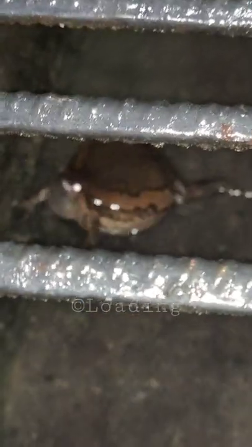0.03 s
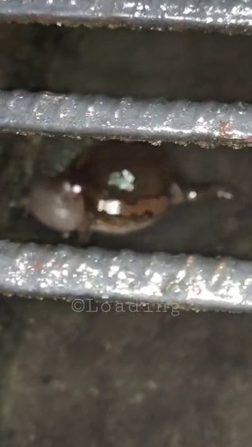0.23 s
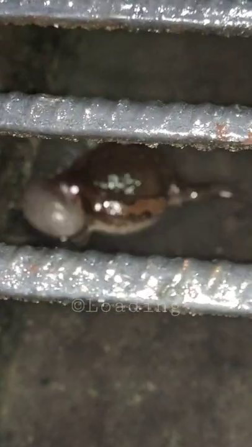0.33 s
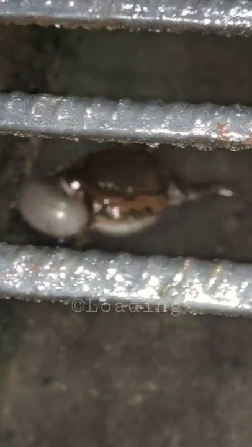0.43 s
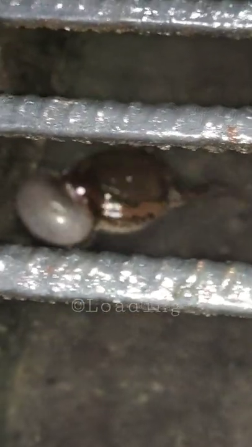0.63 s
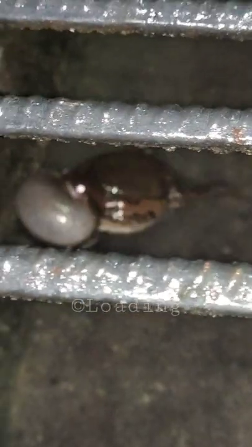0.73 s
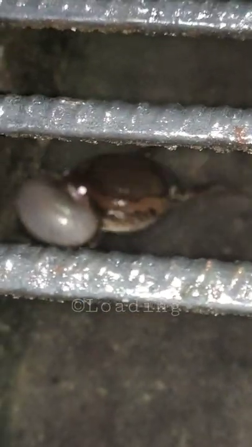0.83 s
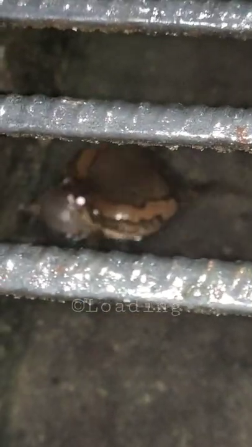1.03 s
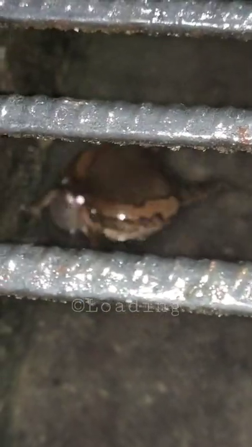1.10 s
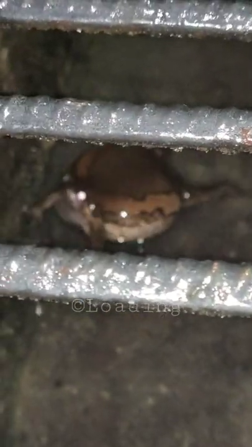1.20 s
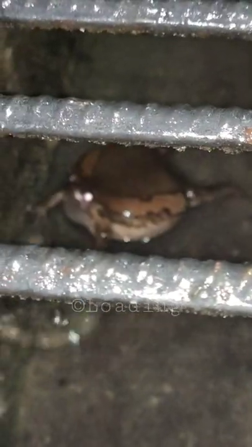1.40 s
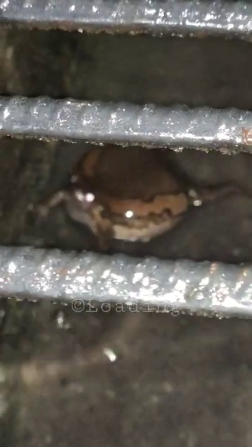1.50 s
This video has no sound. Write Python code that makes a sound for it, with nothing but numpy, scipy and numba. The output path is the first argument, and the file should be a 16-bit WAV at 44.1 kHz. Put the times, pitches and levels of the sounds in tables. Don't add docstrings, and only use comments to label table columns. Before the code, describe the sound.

Loud buzzing frog bellow swells and fades inside a drain, followed by small drips and ticks

```python
import sys
import numpy as np
from scipy import signal
from scipy.fft import rfft, irfft, next_fast_len
from scipy.io import wavfile
from scipy.ndimage import uniform_filter1d
from numba import njit

SR = 44100
rng = np.random.default_rng(int(sys.argv[2]) if len(sys.argv) > 2 else 0)


def undo_db(level):
    steps = np.asarray(level, float) / 20
    return 10 ** steps


def persist_wave(psi):
    counts = np.round(np.clip(psi, -1, 1) * 32767).astype(np.int16)
    wavfile.write(sys.argv[1], SR, np.atleast_2d(counts).T)


N = 68355

# time in seconds, pulse rate in Hz, level in dB,
# brightness as pulse cut-off in Hz, sac resonance in Hz, mouth resonance in Hz.
BELLOW_ROWS = [
    (.128, 95.9, -35.5, 291.5, 337.5, 905),
    (.16, 103.3, -26.5, 350, 344, 892),
    (.235, 111.1, -15, 643, 353.4, 957),
    (.27, 123.3, -12, 852, 297.5, 1017),
    (.35, 126.7, -9, 1353, 296, 1305),
    (.58, 120.8, -9, 1390, 243.5, 1240),
    (.82, 124.4, -12, 1204, 245.6, 1314),
    (.955, 122.1, -18, 825, 261, 1250),
    (1.03, 115.4, -30.5, 360, 248, 1316),
]


def rms_one(x):
    return x / np.sqrt(np.mean(x ** 2) + 1e-20)


def at_hz(points, hz):
    points = np.array(points)
    return np.interp(np.log(hz), np.log(points[:, 0]), points[:, 1])


def slow(x, rate_hz):
    r = np.exp(-2 * np.pi * rate_hz / SR)
    return signal.lfilter([(1 - r) ** 2], [1, -2 * r, r * r], x)


def butter(x, hz, kind, order=2):
    return signal.sosfilt(signal.butter(order, hz, kind, fs=SR, output="sos"), x)


@njit
def moving_peak(x, cos_w, r):
    y = np.zeros(len(x))
    for i in range(2, len(x)):
        drive = (1 - r * r) / 2 * (x[i] - x[i - 2])
        y[i] = drive + 2 * r * cos_w[i] * y[i - 1] - r * r * y[i - 2]
    return y


def peak(x, hz, width_hz):
    cos_w = np.cos(2 * np.pi * hz / SR) + np.zeros(len(x))
    return moving_peak(x, cos_w, np.exp(-np.pi * width_hz / SR))


def double_peak(x, hz, width_hz):
    return peak(peak(x, hz, width_hz), hz, width_hz)


def narrow_hiss(hz, width_hz, db):
    return undo_db(db) * rms_one(double_peak(rng.standard_normal(N), hz, width_hz))


def colour(x, bells):
    for hz, width_hz, db in bells:
        g, a, c = undo_db(db / 2), np.pi * width_hz / SR, -2 * np.cos(2 * np.pi * hz / SR)
        x = signal.lfilter([1 + a * g, c, 1 - a * g], [1 + a / g, c, 1 - a / g], x)
    return x


def later(x, delay_s):
    return np.interp(np.arange(N) - delay_s * SR, np.arange(N), x, left=0)


def night():
    # frequency in Hz, level in dB.
    spectrum = [(40, -25.5), (140, 3), (270, -2), (500, -25), (1200, -19), (2900, -17), (8000, -25),
                (15000, -41.5)]
    # frequency in Hz, correlation 0-1.
    likeness = [(100, 1), (400, 0.62), (1500, 0.47), (5000, 0)]
    night_db, patchy_db, patch_rate_hz = -45.5, 2, 15
    out = 0
    edges_hz = 30 * 2 ** np.arange(0, 9.1, .5)
    white = rng.standard_normal((2, 2, N))
    for k, (low_hz, high_hz) in enumerate(zip(edges_hz, edges_hz[1:])):
        mid, side = butter(white[k % 2], [low_hz, high_hz], "band")
        hz = np.sqrt(low_hz * high_hz)
        alike = np.clip(at_hz(likeness, hz), 0, 1)
        patches = rms_one(slow(rng.standard_normal(N), patch_rate_hz))
        gain = undo_db(at_hz(spectrum, hz) + patchy_db * patches)
        out = out + gain * (np.sqrt(1 + alike) * mid + np.sqrt(1 - alike) * side * [[1], [-1]])
    return undo_db(night_db) * rms_one(out)


def insects():
    # centre in Hz, width in Hz, level in dB.
    bands = [(3040, 300, -62.5)]
    return np.array([sum(narrow_hiss(*row) for row in bands) for _ in range(2)])


def drone():
    return narrow_hiss(147, width_hz=40, db=-55.5)


def drips():
    # start in seconds, peak in dB, pitch in Hz, T60 in seconds.
    bubbles = [
        (.191, -26, 2700, .028),
        (1.065, -33, 4650, .025),
        (1.299, -33, 1600, .045),
        (1.328, -39, 1650, .06),
        (1.408, -46, 3100, .05),
    ]
    rise_s, side_phase = .005, np.array([[-.9], [0]])
    out, t = np.zeros((2, N + SR)), np.arange(SR // 5) / SR
    for start_s, db, hz, t60_s in bubbles:
        bubble = np.sin(2 * np.pi * hz * (t + 0.67 * t * t) + side_phase)
        bubble = bubble * np.minimum(t / rise_s, 1) ** 2
        first = int(start_s * SR)
        out[:, first:first + len(t)] += bubble * undo_db(db - 60 * t / t60_s)
    return out[:, :N]


def ticks():
    # start in seconds, peak in dB, centre in Hz, T60 in seconds.
    hits = [
        (.1176, -39, 4200, .07),
        (1.1468, -34, 3100, .11),
        (1.2381, -29, 2900, .035),
        (1.3922, -40, 5500, .025),
        (1.3925, -34, 1000, .04),
        (1.4496, -46, 3000, .04),
        (1.258, -48, 2800, .15),
        (1.238, -40, 7000, .025),
    ]
    spread, edge_db, rise_s = 1.6, -14, .0005
    out, t = np.zeros((2, N + SR)), np.arange(SR // 5) / SR
    for start_s, db, hz, t60_s in hits:
        spray = rng.standard_normal((2, len(t)))
        spray = spray + spray.mean(0)
        body = rms_one(butter(spray, [hz / spread, hz * spread], "band"))
        burst = body + undo_db(edge_db) * butter(spray, hz, "high")
        first = int(start_s * SR)
        out[:, first:first + len(t)] += burst * undo_db(db - 3 - 60 * t / t60_s) * np.minimum(t / rise_s, 1)
    return out[:, :N]


def level_db(rows):
    release_db_per_s = 300
    table, t = np.array(rows), np.arange(N) / SR
    s, db = table[:, 0], table[:, 2]
    return np.interp(t, s, db, left=-120) - release_db_per_s * np.maximum(t - s[-1], 0)


def larynx(rate_hz, bright_hz):
    # time in seconds, roughness 0-1.
    roughness = [
        (.235, .55),
        (.27, .008),
        (.955, .008),
        (.975, .4),
        (1.06, .3),
        (1.08, .05),
        (1.3, .05),
        (1.38, .6),
        (1.42, .4),
        (1.455, .02),
    ]
    rough = np.interp(np.arange(N) / SR, *np.transpose(roughness))
    turns = np.cumsum(rate_hz) / SR
    chance = rng.standard_normal((2, 400))
    time_wobble, size_wobble = [np.interp(turns + .5, np.arange(400), c) for c in chance]
    phase = 2 * np.pi * (turns + .3 * rough * np.tanh(time_wobble))
    pulses = sum(np.exp(-(k * rate_hz / bright_hz)) * np.cos(k * phase) for k in range(1, 30))
    return -pulses * undo_db(7 * rough * size_wobble), phase


def frog(rows, high_cut_hz):
    sac_width_hz, mouth_width_hz, mouth_db, flat_db, low_cut_hz = 83, 160, 3.5, -18, 220
    first_db, breath_db, breath_hz = -34, -33, 420
    s, *columns = np.transpose(rows)
    rate_hz, _, bright_hz, sac_hz, mouth_hz = [np.interp(np.arange(N) / SR, s, c) for c in columns]
    pulses, phase = larynx(rate_hz, bright_hz)
    sac = peak(pulses, sac_hz, sac_width_hz)
    mouth = undo_db(mouth_db) * peak(pulses, mouth_hz, mouth_width_hz)
    voice = sac - mouth + undo_db(flat_db) * pulses
    voice = butter(butter(voice, low_cut_hz, "high", order=8), high_cut_hz, "low", order=6)
    even = np.sqrt(uniform_filter1d(voice ** 2, size=2600) + 1e-9)
    breath = rms_one(butter(rng.standard_normal(N), [breath_hz / 2, breath_hz * 1.5], "band"))
    voice = voice / even + undo_db(first_db) * np.cos(phase) + undo_db(breath_db) * breath
    return voice * slow(undo_db(level_db(rows)), 85)


def distant_throb():
    rows = [
        (1.06, 119.9, -46, 2500, 250, 1240),
        (1.09, 121, -38.5, 2500, 256, 1235),
        (1.15, 121, -50, 2320, 234, 1184),
        (1.18, 118, -78, 2500, 250, 1200),
    ]
    return peak(frog(rows, 1300), 1240, 170)


def far_frogs():
    earlier = [
        (0, 132.6, -52.5, 710, 275, 797),
        (.045, 124.5, -55, 600, 258, 760),
        (.08, 125, -93.5, 494, 260, 760),
    ]
    neighbour = [
        (1.385, 123.2, -39.5, 502, 300, 821),
        (1.42, 123.6, -38.5, 648, 269, 820),
        (1.46, 128.1, -34.5, 835, 286, 856),
        (1.55, 130.6, -23, 1054, 274, 1053),
    ]
    return frog(neighbour, 1500) + frog(earlier, 1500)


def wall_echoes(far):
    # delay in seconds, gain.
    walls = [
        [(.0031, 0.3), (.0052, -0.4)],
        [(.0024, 0.44), (.0059, 0.27)],
    ]
    return np.array([far + sum(gain * later(far, delay_s) for delay_s, gain in side) for side in walls])


def drain(x):
    drain_db, t60_low_s, cut_hz = -24, .55, 2500
    size = next_fast_len(2 * N)
    hz = np.arange(size // 2 + 1) * SR / size
    t60_s = t60_low_s / (1 + (hz / cut_hz) ** 2)
    out = np.zeros((2, len(hz)), complex)
    for k, lag_s in enumerate(rng.uniform(.011, .045, 16)):
        loop = undo_db(-60 * lag_s / t60_s) * np.exp(-2j * np.pi * hz * lag_s)
        out[k % 2] += (-1) ** (k // 2) * loop / (1 - loop)
    shared = np.exp(-(hz / 500) ** 2)
    out = out * (1 - shared) + out[0] * shared
    return undo_db(drain_db) * irfft(out * rfft(x, size), size)[:, :N]


def pipe(near):
    # mode in Hz, width in Hz, level in dB.
    modes = [(239, 2.2, -17), (253, 2.5, -15), (440, 6, -8), (860, 6, -8)]
    return sum(undo_db(db) * peak(near, hz, width_hz) for hz, width_hz, db in modes)


def rumble():
    return narrow_hiss(46, width_hz=7.3, db=-45) * slow(undo_db(level_db(BELLOW_ROWS)), 20)


def rasps(near):
    # start in seconds, end in seconds, centre in Hz, width in Hz, level in dB.
    buzzes = [
        (.49, .565, 3600, 900, -58),
        (.56, 1.05, 4900, 600, -65),
        (.58, .98, 5400, 200, -65),
        (.24, .5, 6000, 250, -76),
    ]
    t, band = np.arange(N) / SR, butter(near, [900, 1900], "band")
    tips = np.maximum(band / np.sqrt(uniform_filter1d(band ** 2, size=1400) + 1e-7) - 1.6, 0)
    out = np.zeros((2, N))
    for start_s, end_s, hz, width_hz, db in buzzes:
        fade = np.clip(np.minimum(t - start_s, end_s - t) / (end_s - start_s) * 6.0, 0, 1)
        buzz = double_peak(butter(tips, hz * .8, "high", order=6), hz, width_hz) * fade
        rms = np.sqrt(np.sum(buzz ** 2) / np.sum(fade ** 2))
        out += undo_db(db) * buzz / rms * undo_db([[2], [-2]])
    return out


def smear(x):
    # centre in Hz, width in Hz.
    sections = [(680, 110), (930, 130)]
    for hz, width_hz in sections:
        r = np.exp(-np.pi * width_hz / SR)
        a = [1, -2 * r * np.cos(2 * np.pi * hz / SR), r * r]
        x = signal.lfilter(a[::-1], a, x)
    return x


def ducking():
    duck_db, from_db, span_db = -10, -26, 12
    loud = slow(np.clip((level_db(BELLOW_ROWS) - from_db) / span_db, 0, 1), 10)
    return undo_db(duck_db * loud)


def through_grating(near):
    # centre in Hz, width in Hz, level in dB.
    left_drain = [(590, 230, -1), (884, 33, -12.5), (1220, 62, 2.5), (1420, 270, 0.5), (1733, 100, 14),
                  (1970, 300, -7.5), (2470, 200, 7.5)]
    right_drain = [(586, 114, -7.5), (857, 280, -7.5), (1325, 91, 0), (1346.6, 99, 11), (1860, 53, 4.5),
                   (1810, 150, 4.5), (2760, 560, -9)]
    # centre in Hz, width in Hz, level in dB.
    left_more_colour = [(495, 90, -5), (860, 80, -10), (1235, 90, -4), (1355, 90, 4), (2280, 220, -9)]
    right_more_colour = [(617, 70, -7), (990, 90, -3), (1225, 80, -6), (1355, 90, -2)]
    left = colour(colour(later(near, .00012), left_drain), left_more_colour)
    right = colour(colour(near, right_drain), right_more_colour)
    return np.array([left, right])


def bellow():
    return smear(frog(BELLOW_ROWS, 2550))


def scene():
    near, far = bellow(), far_frogs()
    frogs = through_grating(near) + wall_echoes(far) + distant_throb()
    small = ticks() + drips()
    song = insects()
    low = rumble() + drone()
    wet = drain(near + far + small.mean(0)) + pipe(near)
    background = (night() + song) * ducking() + low
    return background + small + frogs + rasps(near) + wet


def top_cut(x):
    return signal.sosfilt(signal.butter(12, 15800, fs=SR, output="sos"), x)


def record(dry):
    ceiling, knee = .999, .92
    room = ceiling - knee
    held = np.clip(dry, -knee, knee)
    mix = held + room * np.tanh((dry - held) / room)
    return top_cut(mix)


dry = scene()
out = record(dry)
persist_wave(out)
```